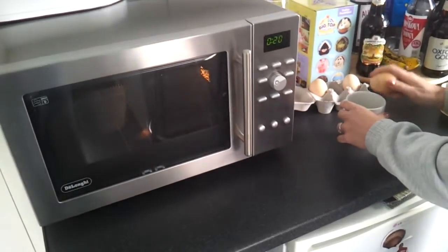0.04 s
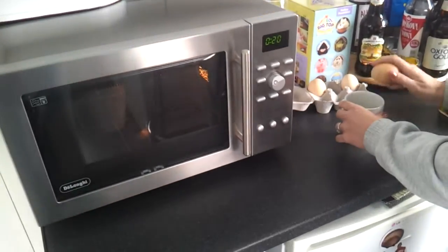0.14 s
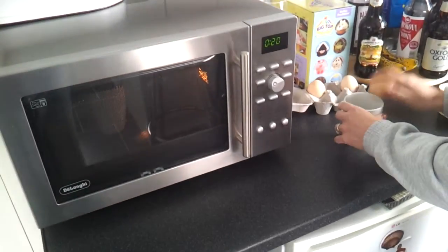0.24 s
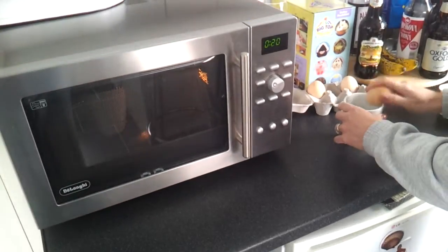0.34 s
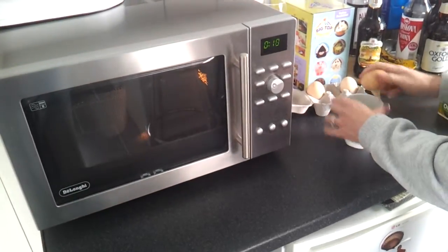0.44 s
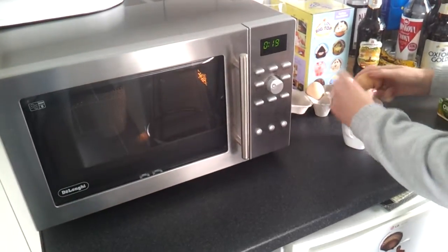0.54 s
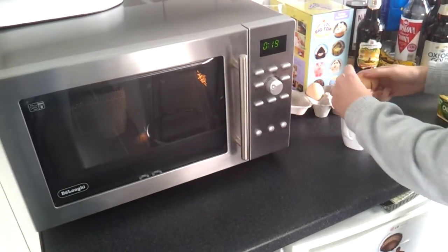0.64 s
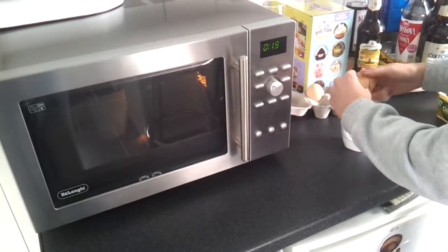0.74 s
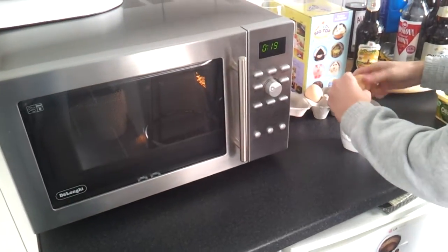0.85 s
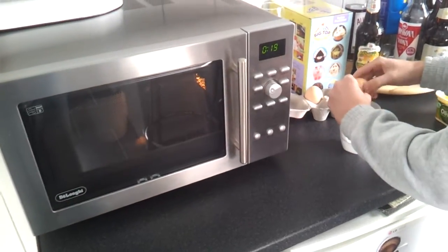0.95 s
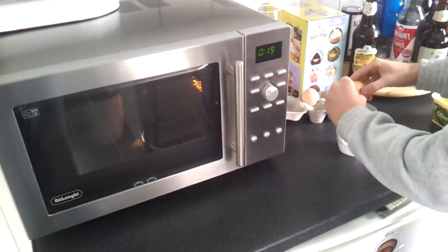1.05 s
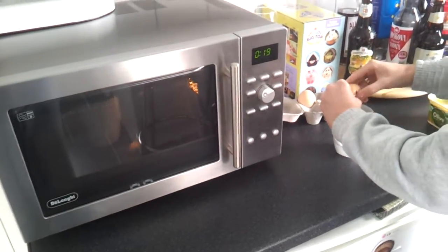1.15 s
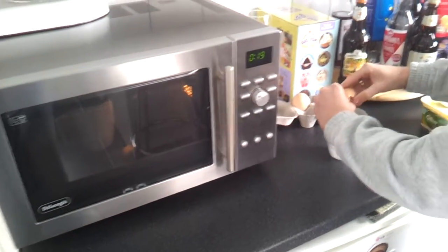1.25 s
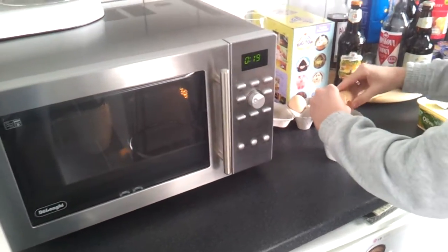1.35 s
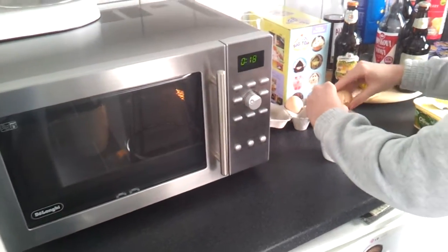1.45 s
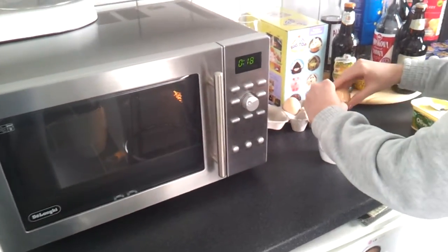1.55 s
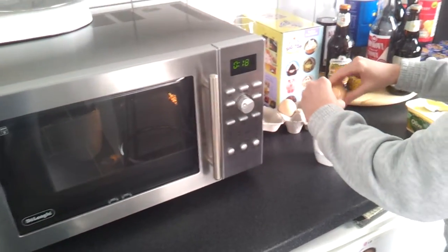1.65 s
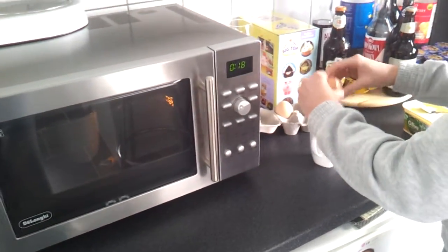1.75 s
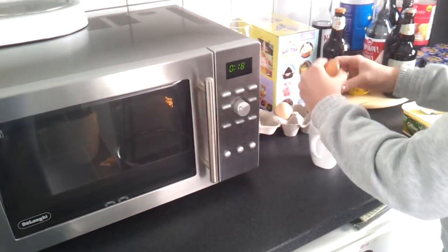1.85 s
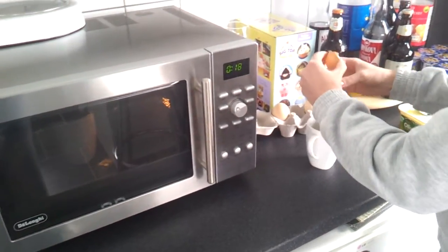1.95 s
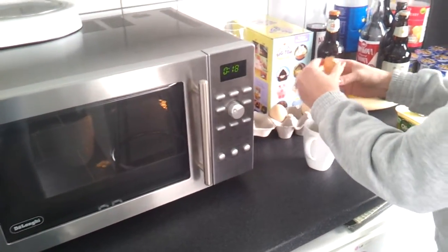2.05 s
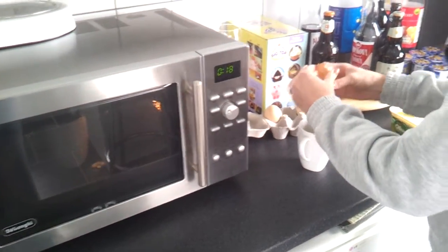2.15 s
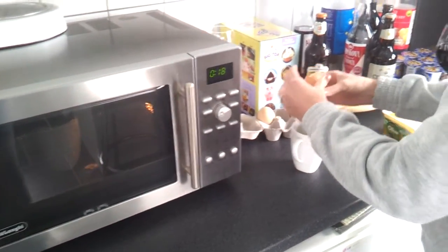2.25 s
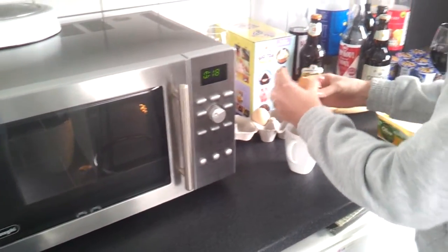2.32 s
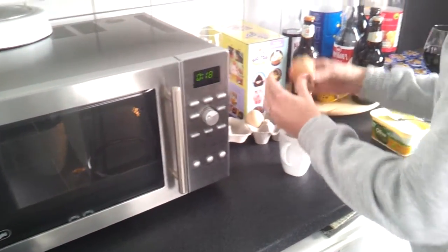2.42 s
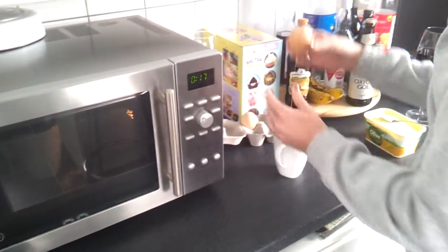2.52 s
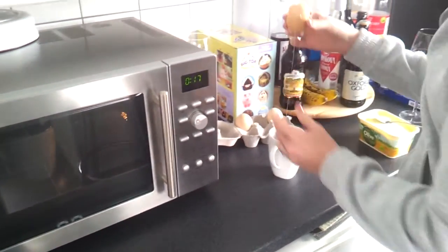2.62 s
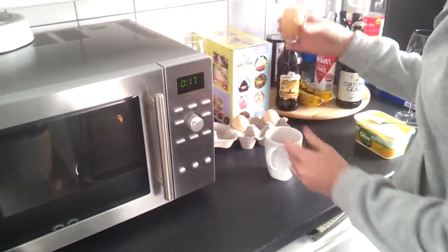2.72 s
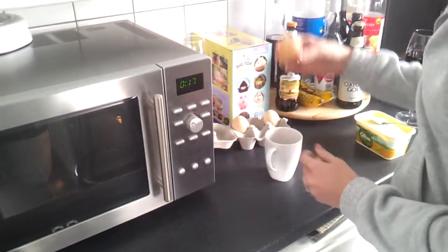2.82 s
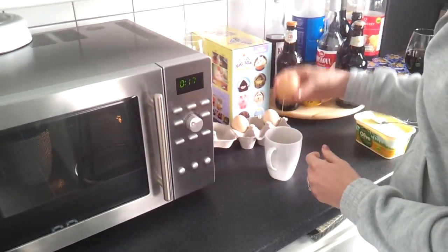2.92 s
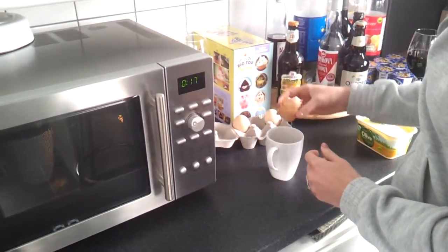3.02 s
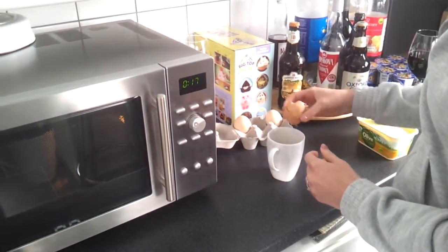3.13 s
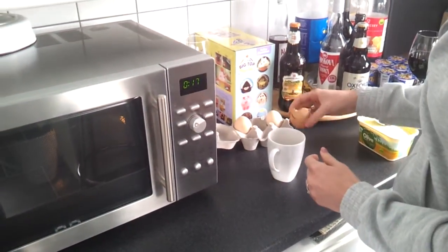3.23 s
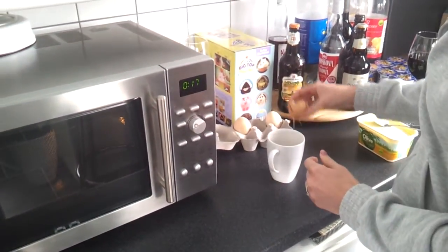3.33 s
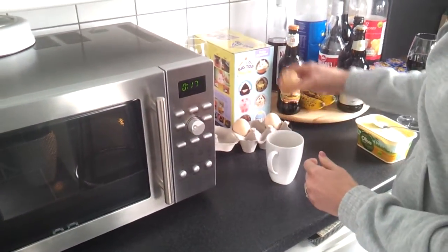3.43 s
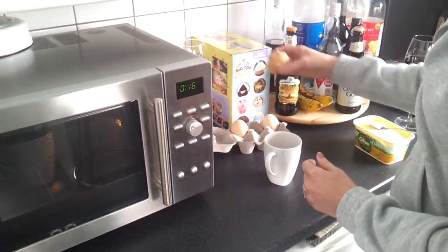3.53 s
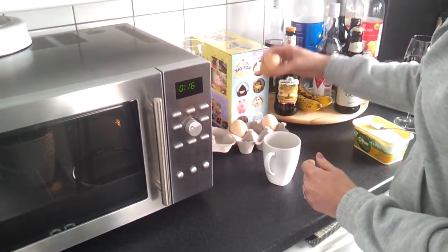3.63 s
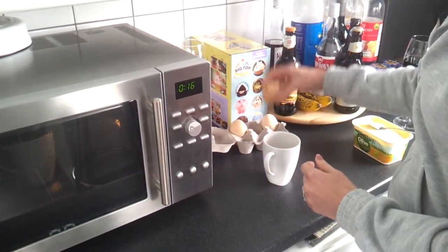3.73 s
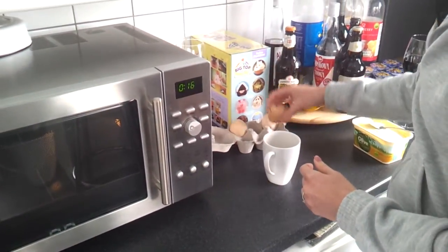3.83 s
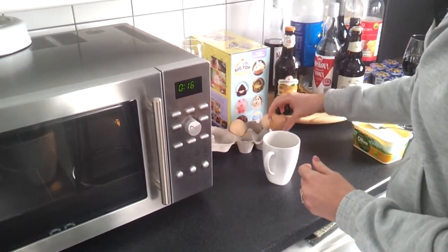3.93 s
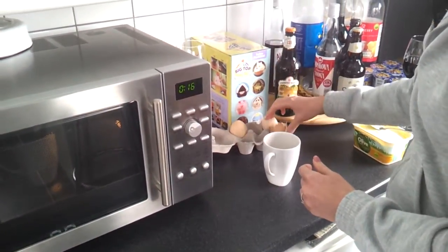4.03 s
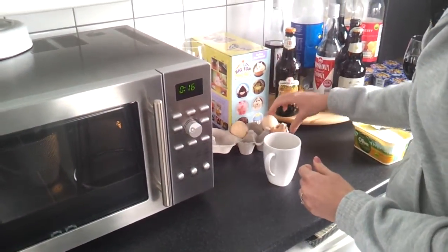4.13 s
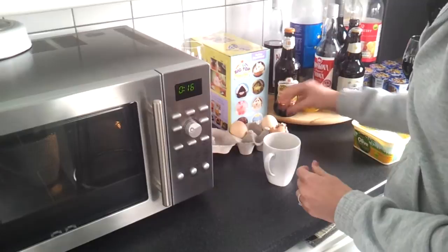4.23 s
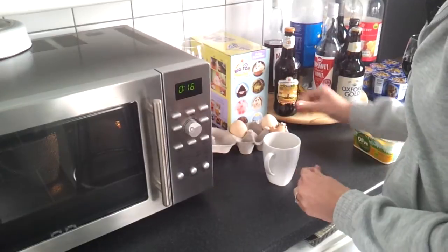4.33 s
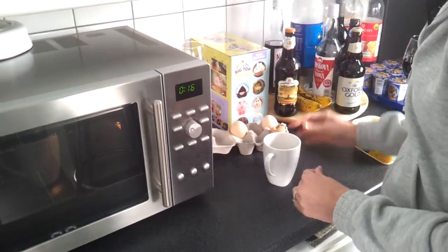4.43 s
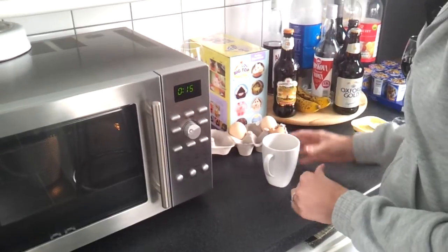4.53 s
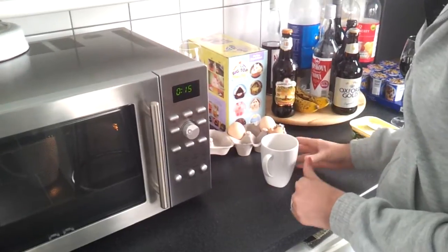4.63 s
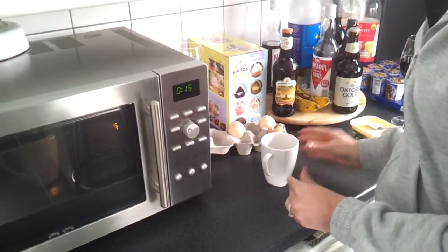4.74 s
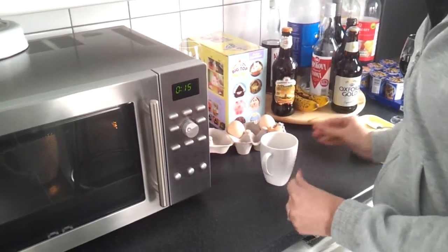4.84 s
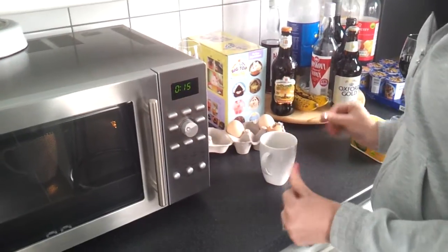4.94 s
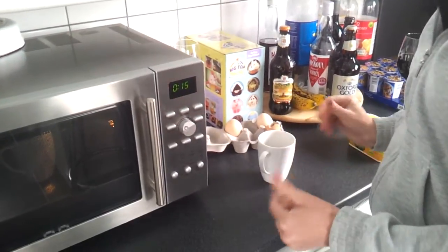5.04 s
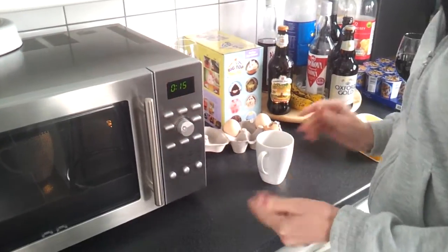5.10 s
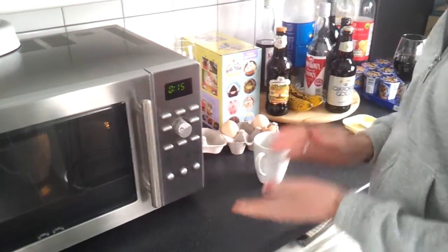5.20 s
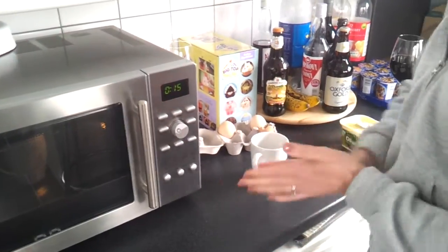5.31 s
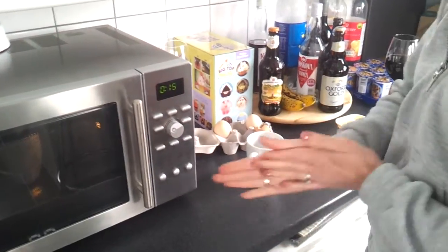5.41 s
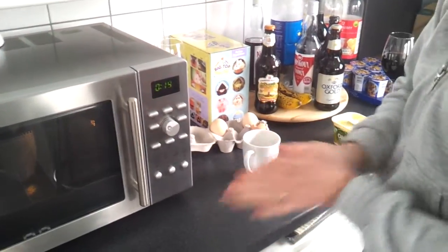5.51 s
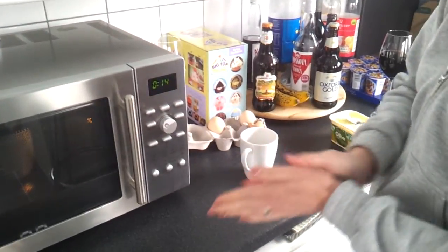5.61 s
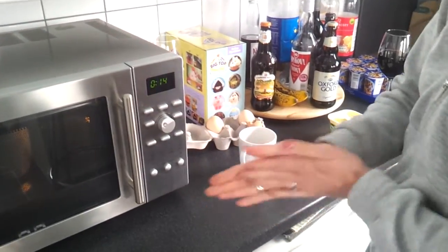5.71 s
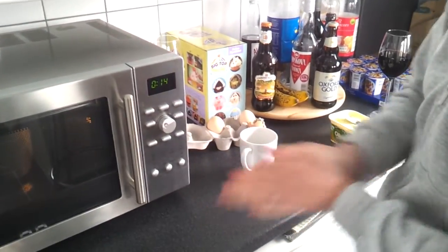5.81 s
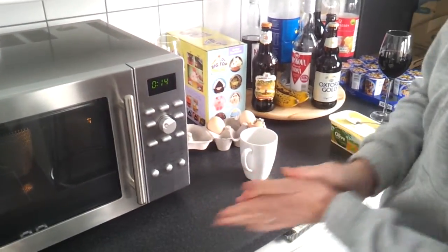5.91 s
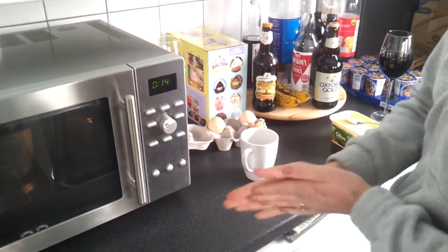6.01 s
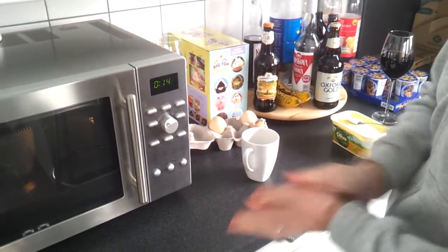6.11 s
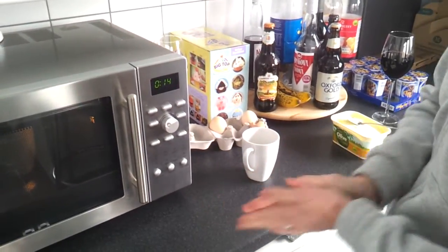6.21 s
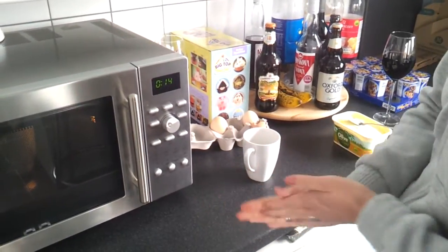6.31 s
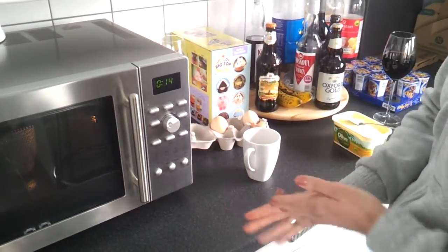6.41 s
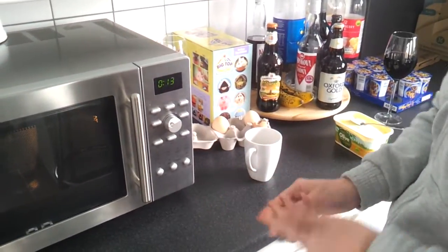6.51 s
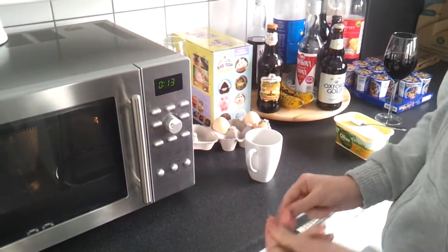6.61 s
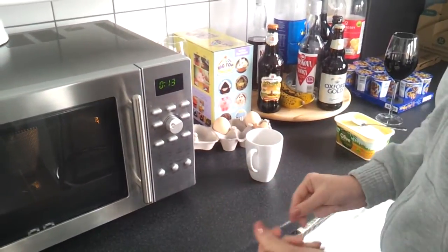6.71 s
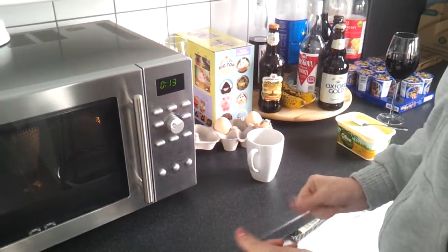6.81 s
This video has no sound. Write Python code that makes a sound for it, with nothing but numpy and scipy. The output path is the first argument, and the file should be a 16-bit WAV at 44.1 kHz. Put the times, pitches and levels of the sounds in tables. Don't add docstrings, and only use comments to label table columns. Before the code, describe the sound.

A microwave oven hums steadily while an egg is cracked sharply on a mug, shell crackles apart, and two palms rub briskly together.

```python
import sys
import numpy as np
from scipy import signal
from scipy.fft import rfft, irfft
from scipy.io import wavfile
from scipy.ndimage import uniform_filter1d

SR = 44100
rng = np.random.default_rng(int(sys.argv[2]) if len(sys.argv) > 2 else 0)


def gain_from_db(level_db):
    decades = np.asarray(level_db, float) / 20
    return 10 ** decades


def wrap_up_sound(samples):
    columns = np.atleast_2d(samples).T
    tamed = np.clip(columns, -1, 1)
    steps = np.round(tamed * 32767).astype(np.int16)
    wavfile.write(sys.argv[1], SR, steps)


N = 302526
T = np.arange(N) / SR
BLADE_HZ = 168.6
SHAFT_HZ = BLADE_HZ / 4


def colour(x, points):
    hz, db = np.transpose(points)
    f = np.fft.rfftfreq(len(x), 1 / SR) + 1
    gain = gain_from_db(np.interp(np.log(f), np.log(hz), db))
    return irfft(rfft(x) * gain, len(x))


def band(x, lo_hz, hi_hz, order=2):
    edges = [lo_hz, min(hi_hz, .45 * SR)]
    return signal.sosfilt(signal.butter(order, edges, "band", fs=SR, output="sos"), x)


def unit(x):
    return x / np.sqrt(np.mean(x ** 2))


def walk(rate):
    hold = int(SR / rate)
    steps = np.repeat(rng.standard_normal(N // hold + 1), hold)
    slewed = uniform_filter1d(uniform_filter1d(steps, hold), hold)
    return unit(slewed[:N])


def add(out, start_s, piece):
    i = int(start_s * SR)
    out[i:i + len(piece)] += piece[:len(out) - i]


def tone(hz, db, wander_db):
    level = gain_from_db(db + wander_db * walk(7))
    return np.sqrt(2) * level * np.cos(2 * np.pi * hz * T)


def ring(hz, t60, rise=0.0012):
    t = np.arange(int(.4 * SR)) / SR
    decay = np.exp(-np.log(1000) * t / t60)
    return np.sin(2 * np.pi * hz * t) * decay * (1 - np.exp(-t / rise))


def swells(top_s, db, rise, fall):
    top_s, db, rise, fall = (np.reshape(v, (-1, 1)) for v in (top_s, db, rise, fall))
    t = np.arange(0, N / SR, .001)
    late = t - top_s
    slope = np.where(late < 0, late / rise, -late / fall)
    return np.interp(T, t, gain_from_db(db + 20 * slope).sum(axis=0))


def rough(deepest_db):
    return rng.standard_normal(N) * gain_from_db(deepest_db * np.minimum(rng.exponential(size=N), 7))


# f/blade rate, level/dB, wander/dB
BLADE_TONES = [(.25, -70, 2.5), (1, -45.5, 0.66), (2, -44, 0.4), (3, -56, 0.7), (5, -56.5, 4.), (6, -64, 5),
               (7, -64, 1)]


def fan():
    return sum(tone(k * BLADE_HZ, db, wander) for k, db, wander in BLADE_TONES)


# f/twice the mains rate, level/dB, wander/dB
CORE_TONES = [(1, -63, 1), (2, -50.5, 2), (3, -63, 2.5)]


def transformer():
    twice_mains_hz, side_db = 99.95, -11
    out = np.zeros(N)
    for k, db, wander in CORE_TONES:
        hz = k * twice_mains_hz
        out += tone(hz, db, wander)
        out += tone(hz + SHAFT_HZ, db + side_db, wander)
    return out


# f/Hz, level/dB
SUPPLY_TONES = [(6150.5, -75), (6350.4, -75), (6650.3, -74), (6750.1, -74)]


def supply():
    return sum(tone(hz, db, 1.5) for hz, db in SUPPLY_TONES)


# f/Hz, level/dB per Hz
VENT_SPECTRUM = [(8, -26.5), (28, -35.5), (45, -36), (70, -27.5), (120, -16), (300, -12.5), (450, -11),
                 (880, -16.5), (950, -21), (1650, -16.5), (2300, -23.5), (3500, -26.5), (6500, -27.5),
                 (8000, -35.5)]
# f/Hz, width/Hz, level/dB
CASE_MODES = [(139, 14, -2), (232, 5.1, 1), (590.7, 6.9, 3), (630.9, 20, 0.5), (688, 15, 2.5),
              (716, 11, -0.5), (761, 6.7, 4.5), (836, 11, 10.5), (883.9, 26, 1.5), (911, 4.9, 3),
              (979, 20, -2), (1090, 40, -1), (1305, 16, -1), (1504.6, 12, -3.5)]
# t/s, level/dB
AIR_FLOW = [(0, 0.), (1.5, -0.2), (3, 0.05), (4.6, -0.1), (6.86, -0.16)]


def vents():
    f = np.fft.rfftfreq(N, 1 / SR)
    case = 1 + sum(gain_from_db(db) / (1 + (2 * (f - hz) / width) ** 2) for hz, width, db in CASE_MODES)
    chop = 1 + 0.037 * np.cos(2 * np.pi * BLADE_HZ * T)
    spectrum = rfft(colour(rng.standard_normal(N), VENT_SPECTRUM) * chop) * case
    octave = np.log2(f / 60 + 1e-9)
    out = np.zeros(N)
    for k in np.arange(-5, 8.):
        share = np.clip(1 - abs(octave - k), 0, 1)
        out += irfft(spectrum * share, N) * gain_from_db(0.69 * walk(6.6))
    out = out / np.std(band(out, 900, 7000, order=4))
    return out * gain_from_db(-45 + np.interp(T, *np.transpose(AIR_FLOW)))


def splinters(rows, share, length_s):
    out, t = np.zeros(N), np.arange(int(.06 * SR)) / SR
    edge = 1 + max(share, .05) / 2
    for s, db, hz in rows:
        bits = rng.standard_normal(len(t)) * np.exp(-t / length_s)
        bits[0] += 6
        spectrum = rfft(bits)
        even = irfft(spectrum / abs(spectrum), len(t))
        burst = band(even * np.exp(-t / (4 * length_s)), hz / edge, hz * edge)
        add(out, s, gain_from_db(db) * burst / np.max(abs(burst)))
    return out


# t/s, peak level/dB, centre f/Hz
SHELL_SNAPS = [(0.334, -4, 5000), (0.336, -7, 7300), (0.344, -13, 4700), (0.358, -13.5, 5000),
               (.8095, -34, 2400), (.9496, -28.5, 5530), (1.0653, -20, 5770), (1.1, -29, 5200),
               (1.226, -25.5, 6200), (1.5131, -28.5, 5800), (2.122, -34, 5050), (2.306, -31.5, 5500),
               (3.702, -36.5, 5080), (4.1196, -15, 2020), (4.1206, -16, 5500), (4.125, -21.5, 1650),
               (4.130, -23.5, 1400)]


def snaps():
    return splinters(SHELL_SNAPS, share=0.7, length_s=0.001767)


# f/Hz, level/dB, t60/s
MUG_MODES = [(2560, -39, 0.38), (1492, -33, .12)]


def mug():
    out = np.zeros(N)
    for hz, db, t60 in MUG_MODES:
        add(out, SHELL_SNAPS[0][0], gain_from_db(db) * ring(hz, t60))
    return out


# t/s, peak level/dB, ring f/Hz, thump level/dB relative
MUG_KNOCKS = [(0.335, 0.5, 858, -31), (0.343, -13.5, 775, 2.5), (0.47, -6, 736, -22),
              (0.475, -5.5, 765, -10), (0.491, -6, 765, -33.5), (0.497, -6, 1003, -13),
              (0.503, -19.5, 800, -8.5), (0.52, -11.5, 716, -28), (0.809, -6.5, 900, -12),
              (0.835, -4.5, 790, -12), (0.844, -9, 840, -12), (0.861, -8, 600, -14),
              (0.928, -28, 603, -12.5)]


def knocks():
    thump = ring(440, 0.01955, rise=.001) + 0.65 * ring(331, 0.029, rise=0.0018)
    thump += 0.3 * ring(221.4, 0.057, rise=0.0036) + 0.19 * ring(160, 0.041, rise=0.0059)
    out = np.zeros(N)
    for s, db, hz, thump_db in MUG_KNOCKS:
        base = ring(hz, 0.013) + 0.2 * ring(1.457 * hz, 0.01984) + 0.09 * ring(2.18 * hz, 0.0103)
        add(out, s, gain_from_db(db) * (base + gain_from_db(thump_db) * thump))
    return band(out, 80, 6000)


# t/s, peak level/dB, centre f/Hz
FLAT_SLAPS = [
    (0.3365, -9.5, 2410),
    (1.077, -24.5, 3800),
    (4.066, -28.5, 5000),
    (4.112, -32, 3500),
    (4.1198, -20, 4800),
    (5.341, -21.5, 3580),
]


def slaps():
    return splinters(FLAT_SLAPS, share=2.1, length_s=.004)


# top t/s, level/dB
SHELL_PULLS = [
    (.96, -49),
    (1.085, -48),
    (1.26, -52),
]


def tearing():
    crackle = unit(band(rough(3.68), 1700, 7500, order=1))
    return swells(*np.transpose(SHELL_PULLS), rise=0.11, fall=0.16) * crackle


# t/s, peak level/dB, centre f/Hz
SHELL_PINGS = [
    (0.998, -34, 1636),
    (1.1362, -33, 5150),
    (1.244, -35, 1670),
    (1.513, -28.5, 4170),
    (1.518, -33, 4900),
    (1.5816, -30.5, 2580),
    (3.347, -39.5, 5270),
]


def pings():
    return splinters(SHELL_PINGS, share=.22, length_s=.0027)


# top speed t/s, level/dB, rise/s and fall/s per 20 dB, skin catch level/dB
PALM_STROKES = [
    (5.455, -45.5, 0.39, 0.01, -61),
    (5.58, -36, 0.12, 0.0672, -47.5),
    (5.712, -33.5, .025, .13, -36.5),
    (5.892, -37.5, .09, 0.06, -50),
    (6.016, -40.5, .07, 0.1, -30.5),
    (6.166, -36, .09, 0.04, -45),
    (6.305, -37, 0.079, 0.1, -30.5),
]


def hands():
    slow_hz, hz_per_db, slow_db, part_s = 5850, 19, -51, 6.47
    s, db, rise, fall, catch_db = np.transpose(PALM_STROKES)
    touching = (T > FLAT_SLAPS[-1][0]) * np.clip((part_s - T) / .04, 0, 1)
    level = swells(s, db, rise, fall) * touching
    centre = slow_hz + hz_per_db * np.maximum(20 * np.log10(level + 1e-9) - slow_db, 0)
    level = level + swells(s, catch_db, rise=.012, fall=.005)
    hiss = np.zeros(N)
    for mid_hz in np.geomspace(2200, 8500, num=9):
        slips = unit(band(rough(3.6), mid_hz / 0.956, mid_hz * 1.167, order=1))
        weight = 0.11 + np.exp(-((mid_hz - centre) / 2200) ** 2)
        hiss += weight * np.sqrt(mid_hz / 6000) * slips
    return level * gain_from_db(-5.2) * hiss


# f/Hz, t60/s, level/dB
ROOM_BANDS = [(193.3, 0.63, 0.5), (415, 0.42, 5), (1050, 0.5, -1.5), (2200, 0.47, -1), (4500, 0.7, -7.5),
              (7600, 0.4, 1)]


def kitchen(x):
    wet_db = -0.5
    t = np.arange(int(.8 * SR)) / SR
    tail = np.zeros(len(t))
    for hz, t60, db in ROOM_BANDS:
        noise = band(rng.standard_normal(len(t)), hz / 1.68, hz * 1.78)
        tail += gain_from_db(db) * noise * np.exp(-np.log(1000) * t / t60)
    tail *= 1 - np.exp(-t / 0.00075)
    tail *= 1 + .6 * np.exp(-t / .02)
    tail *= gain_from_db(wet_db) / np.sqrt(np.sum(tail ** 2))
    return x + signal.fftconvolve(x, tail)[:N]


def scene():
    oven = fan() + transformer() + supply() + vents()
    egg = snaps() + mug() + knocks() + slaps() + tearing() + pings()
    return (oven + kitchen(egg + gain_from_db(-2.5) * hands()))[None]


def low_pass(x):
    return signal.sosfilt(signal.butter(12, 8880, fs=SR, output="sos"), x)


# f/Hz, level/dB
MIC_SLOPE = [(20, 1.5), (6600, -0.5), (7300, -7), (7700, -16), (8000, -32), (9000, -70.5), (9600, -130)]
# f/Hz, level/dB
MIRROR_LEAK = [(7950, -88.5), (8050, -23.5), (8300, -1.5), (8700, -15.5), (9100, -37.5), (9400, -130)]


def record(dry):
    x = colour(dry[0], MIC_SLOPE)
    image = x * np.cos(2 * np.pi * 16000 * T)
    mix = (x + colour(image, MIRROR_LEAK))[None]
    return low_pass(mix)


dry = scene()
out = record(dry)
wrap_up_sound(out)
```